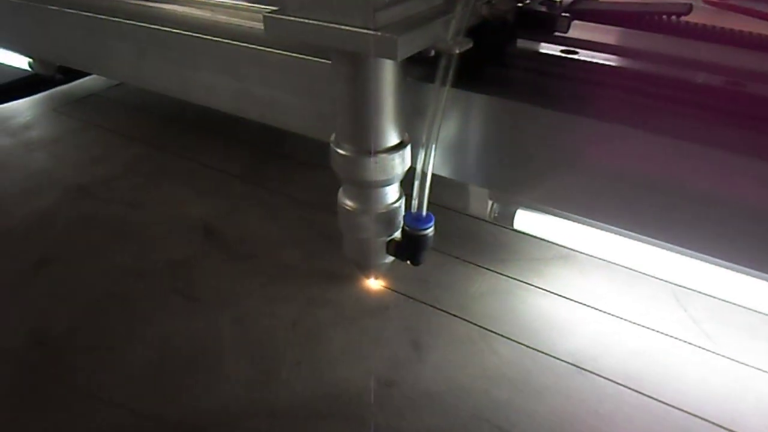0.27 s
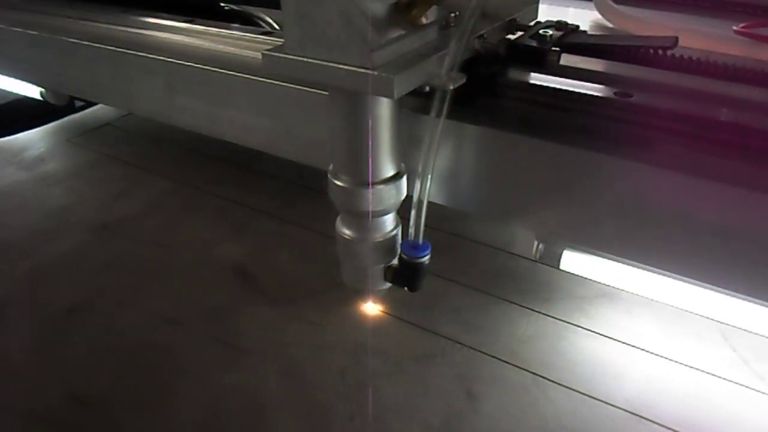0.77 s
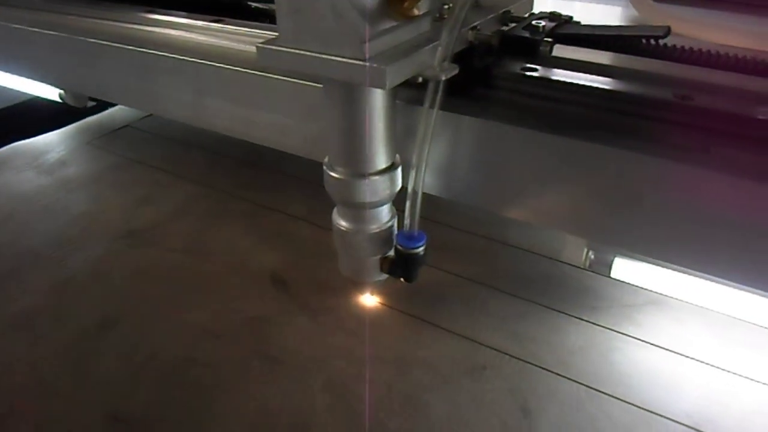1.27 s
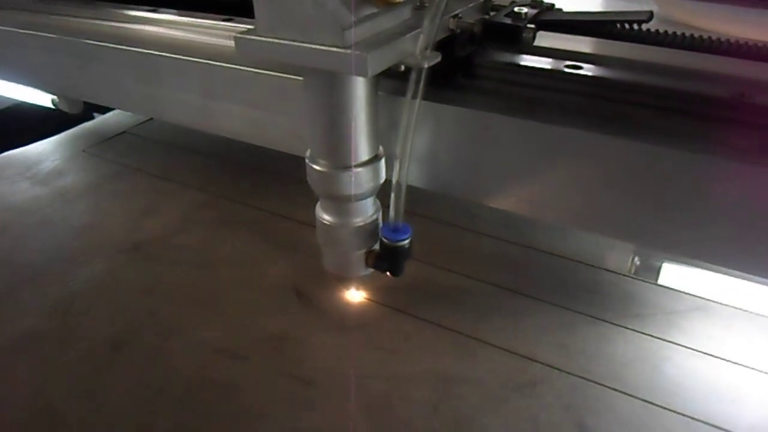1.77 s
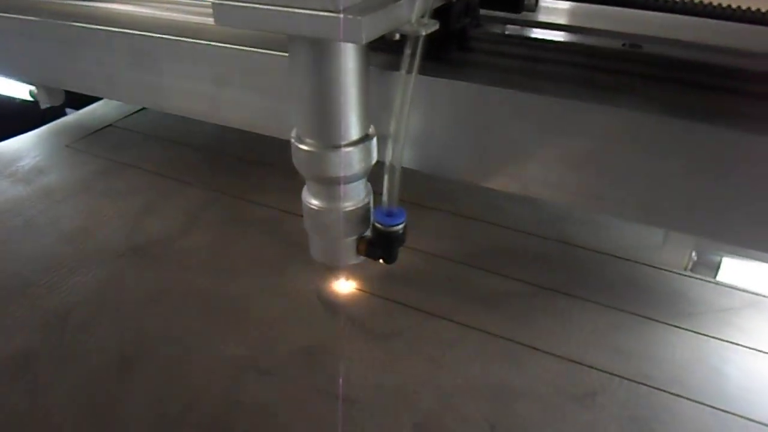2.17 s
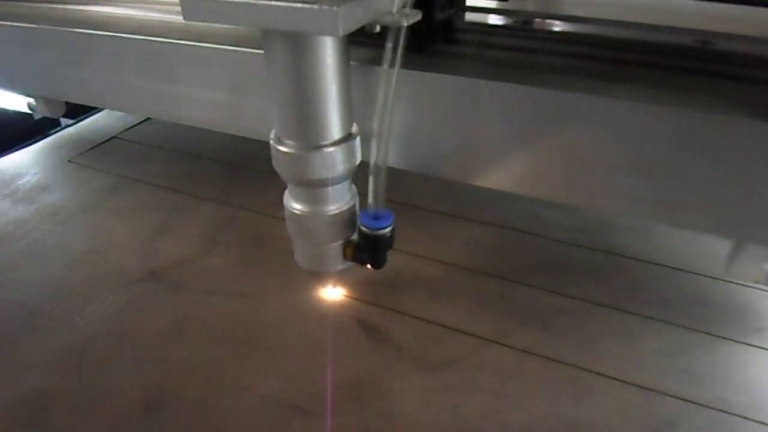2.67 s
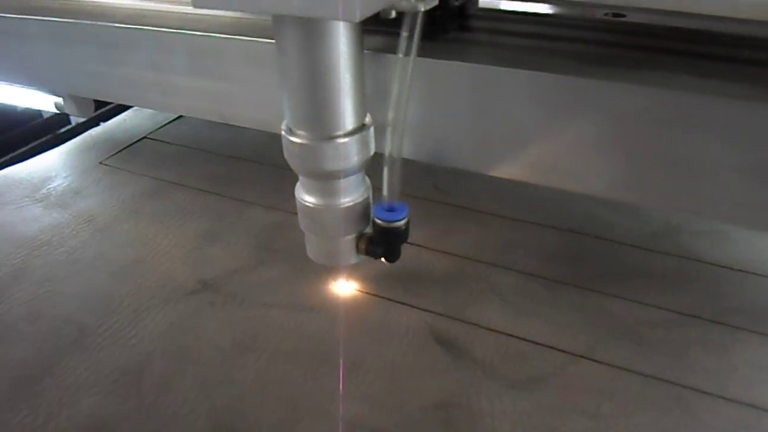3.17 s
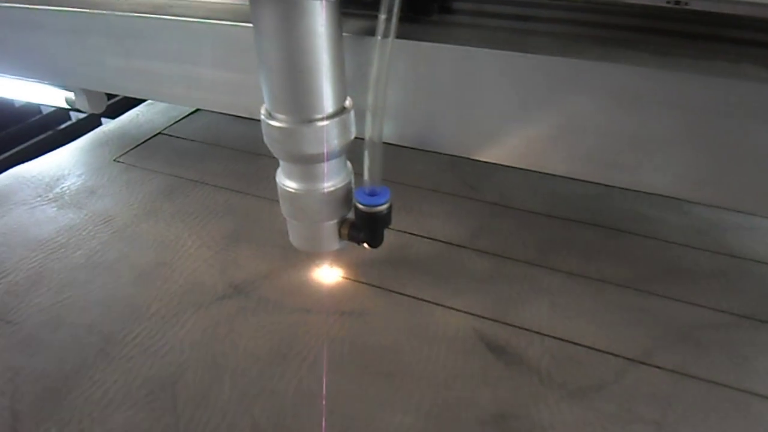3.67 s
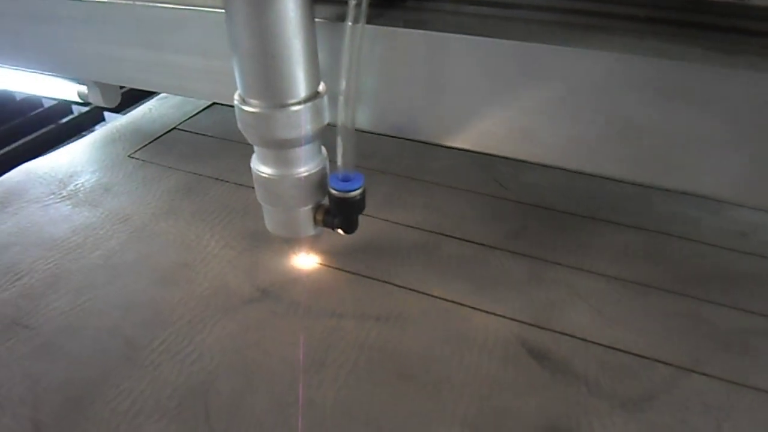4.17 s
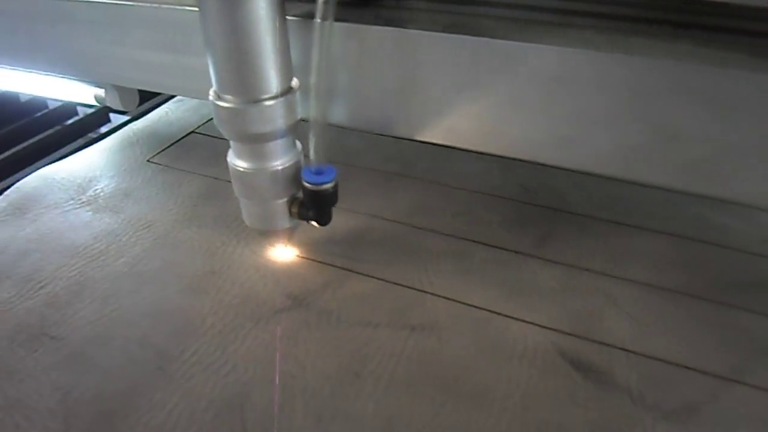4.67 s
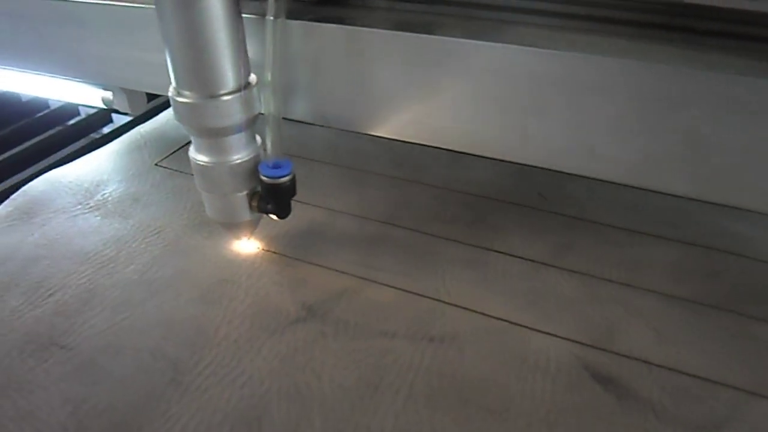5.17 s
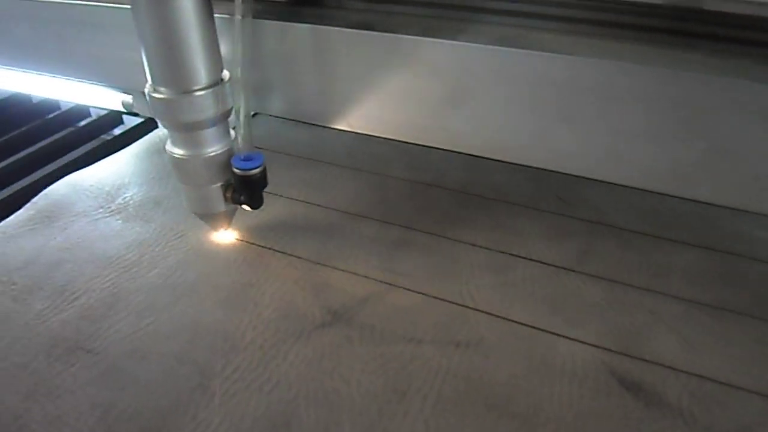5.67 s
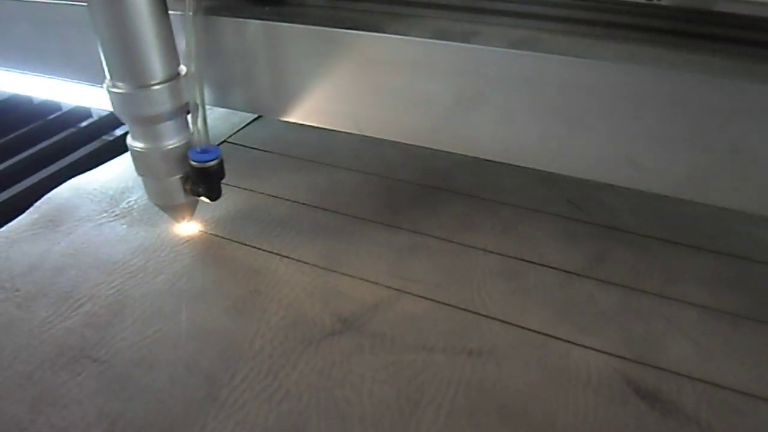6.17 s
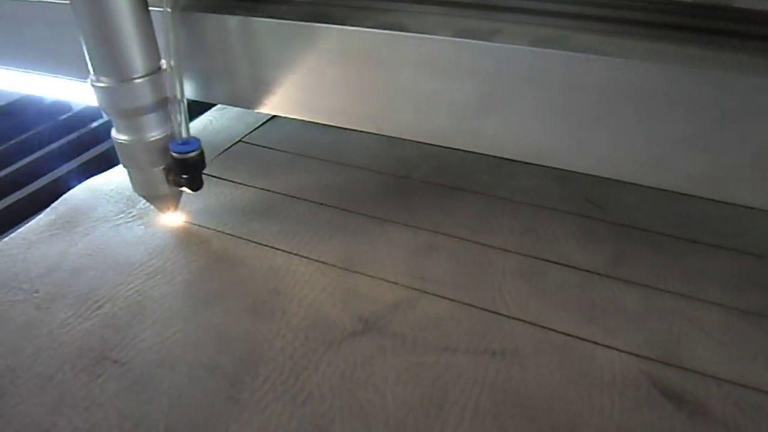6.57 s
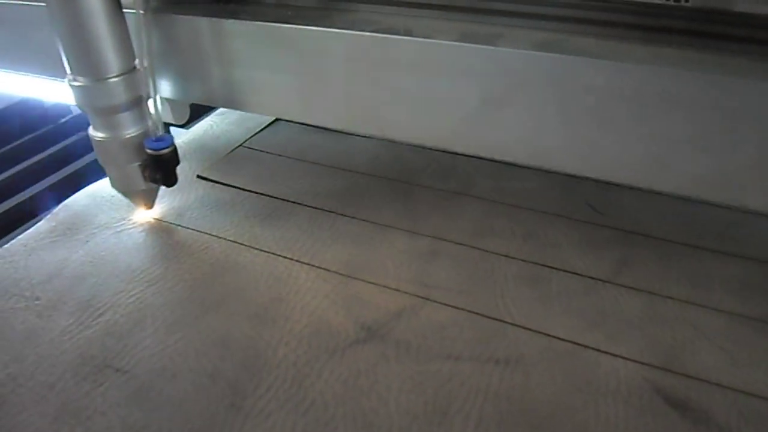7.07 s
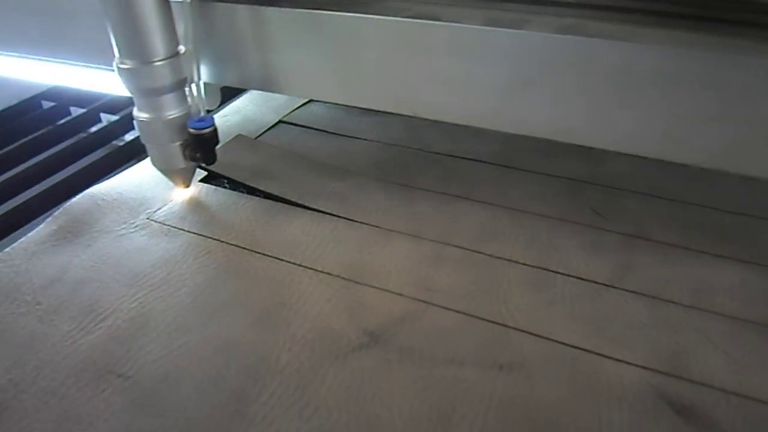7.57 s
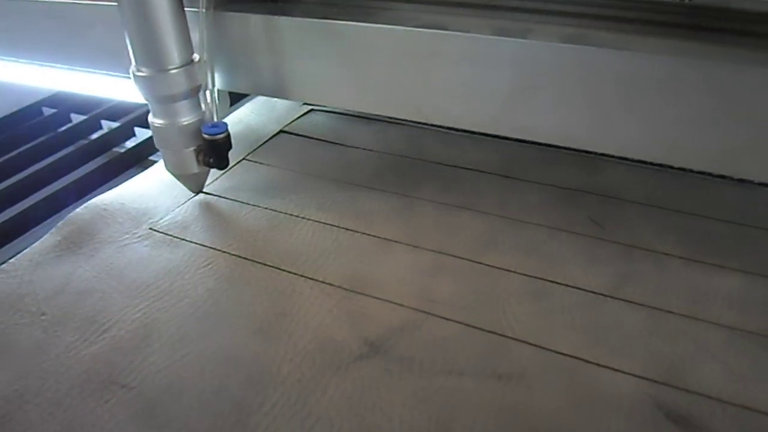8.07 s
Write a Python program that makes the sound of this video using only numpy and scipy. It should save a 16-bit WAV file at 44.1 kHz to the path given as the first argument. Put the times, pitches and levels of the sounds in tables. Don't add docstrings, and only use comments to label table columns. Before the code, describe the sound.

A dense, sizzling rush of compressed air dominates from the first moment, fluttering finely and swelling slightly. Behind it sit a pulsing pump drone, steady motor tone and airy fan rush. Near the end the motor tone stops, a cross slide whirs briefly, air puffs through the cut, the hiss eases very briefly, then a faint low thrum marks restarting. Close small microphone, essentially mono, in a machine workshop.

```python
import sys
import numpy as np
from scipy import signal
from scipy.fft import rfft, irfft, next_fast_len
from scipy.io import wavfile
from scipy.ndimage import uniform_filter1d, map_coordinates

SR = 44100
rng = np.random.default_rng(int(sys.argv[2]) if len(sys.argv) > 2 else 0)


def field_ratio(decibels):
    return 10 ** (np.asarray(decibels, dtype=float) / 20)


def digitize_waveform(pressure):
    field = np.atleast_2d(pressure).T
    bounded = np.clip(field, -1, 1)
    quanta = np.round(bounded * 32767).astype(np.int16)
    wavfile.write(sys.argv[1], SR, quanta)


N = 366902

# f/Hz, level/dB per Hz
MIDWAY_COLOUR = [(1060, -45), (1800, -29), (2080, -20.5), (2550, -20.5), (3070, -12.5), (3570, -13),
                 (3940, -17), (4940, -15), (5450, -11.5), (6240, -11.5), (7590, -8.5), (8560, -9.5),
                 (9960, 2.5), (10600, -3), (10900, -10), (14200, -29), (22000, -120)]

PUMP_HZ = 17.21
HUM_DB, HUM_DB_PER_S = 0.65, -0.5
CUT_END_S, SLIDE_RISE_S = 7.28, 0.38
BEAM_OFF_S, BEAM_ON_S, BEAM_FADE_S, RECOVER_S = 7.93, 8.11, 0.03, 0.17


def clock():
    return np.arange(N) / SR


def ramp(start, length):
    return np.clip((clock() - start) / length, 0, 1)


def bump(centre, length):
    return np.sin(np.pi * ramp(centre - length / 2, length)) ** 2


def unit(x):
    return x / np.sqrt(np.mean(x ** 2) + 1e-20)


def along(points, hz):
    f, value = np.transpose(points)
    return np.interp(np.log(hz + 1), np.log(f + 1), value)


def filtered(x, response):
    m = next_fast_len(N + 8192)
    return irfft(rfft(x, m) * response(np.fft.rfftfreq(m, 1 / SR)), m)[..., :N]


def coloured(noise, colour):
    return unit(filtered(noise, lambda hz: field_ratio(along(colour, hz))))


def wobble(rate):
    knots = rng.standard_normal(int(N * rate / SR) + 4)
    return map_coordinates(knots, [np.arange(N) * rate / SR], order=1)


def patchy(patchy_db, size):
    z = signal.stft(rng.standard_normal(N + 512), nperseg=512)[2]
    field = uniform_filter1d(rng.standard_normal(z.shape), size[0], 0)
    field = uniform_filter1d(field, size[1], 1)
    return signal.istft(z * field_ratio(patchy_db * unit(field)), nperseg=512)[1][:N]


def tones(rows, unsteady_db):
    t = np.arange(0, N, 8) / SR
    knots = np.linspace(0, N / SR, 20)
    x = np.zeros(len(t))
    for hz, db in rows:
        level = np.interp(t, knots, field_ratio(db + unsteady_db * rng.standard_normal(20)))
        x += level * np.sin(2 * np.pi * hz * t + rng.uniform(0, 2 * np.pi))
    return np.sqrt(2) * signal.resample_poly(x, 8, 1)[:N]


def standing(db, node, spacing, depth):
    return field_ratio(db) * (1 - np.clip(depth, 0, 1) * np.cos(2 * np.pi * (clock() - node) / spacing))


def rest():
    return ramp(BEAM_OFF_S - BEAM_FADE_S / 2, BEAM_FADE_S) - ramp(BEAM_ON_S, RECOVER_S)


def bounced(air, place):
    # place, off gantry/ms, off table/ms, off cover/ms
    bounces = [(0, 2.595, .9, 2.8), (.75, 2.445, .9, 2.745), (1.6, 2.443, .95, 2.76), (3, 2.42, 1.12, 2.57)]
    bounce_gain = [.13, .1, -.08]
    at, *delays = np.transpose(bounces)
    total = air
    for gain, ms in zip(bounce_gain, delays):
        delay = np.interp(place, at, ms) / 1000
        total = total + gain * map_coordinates(air, [np.arange(N) - delay * SR], order=3)
    return total


def jet():
    # t/s, place (0 near, 1 midway, 2 far, 3 corner)
    travel = [(0, 0.5), (1.6, 0.6), (3.2, 1), (5.2, 1.44), (6.1, 2.4), (6.8, 2), (7.3, 3), (8.32, 3)]
    # centre t/s, level/dB, length/s
    swells = [(.05, 0.2, .3), (0.746, -0.9, 0.4), (1.1, -1, .3), (2.2, 0, 0.57), (4.33, -1, .4),
              (5.3, 0, .5), (7.304, 1.5, .34), (7.52, -0.6, 0.17), (7.68, 0.9, .2)]
    # f/Hz, level/dB per Hz
    near_colour = [(1060, -37), (1800, -14), (2060, -23.5), (2290, -17.5), (2620, -18), (2870, -11.5),
                   (3340, -9.5), (3680, -16.5), (3970, -11.5), (6150, -11.5), (7420, -5), (8370, -7.5),
                   (9810, 5), (10300, 2.5), (10900, -1), (14200, -43), (22000, -120)]
    # f/Hz, level/dB per Hz
    far_colour = [(1060, -58), (1800, -26), (2560, -22.5), (2790, -24), (3050, -17), (3680, -15),
                  (4000, -20.5), (5210, -16.5), (5660, -15.5), (7370, -14), (7880, -9.5), (9230, -6),
                  (9960, 2.5), (10300, 0.5), (10900, -11), (14200, -43), (22000, -120)]
    # f/Hz, level/dB per Hz
    corner_colour = [(1060, -46), (1800, -22), (2360, -20), (2640, -18.5), (2870, -17), (3680, -11.5),
                     (4000, -14), (5570, -13.5), (6150, -11), (6680, -12), (8060, -5.5), (9230, -5.5),
                     (9960, 0), (10300, -1.5), (10900, -11.5), (14200, -44), (22000, -120)]

    swell_db = sum(db * bump(s, length) for s, db, length in swells)
    hiss_db = -28 - 0.2061 * clock() + swell_db - 1 * rest()
    sizzle_db = -25.5 + 0.18 * clock() + 1.4 * swell_db - 2.5 * rest()

    place = np.interp(clock(), *np.transpose(travel))
    flutter = field_ratio(0.44 * wobble(70) + 0.49 * wobble(500))
    air = bounced(flutter * patchy(0.62, size=(2, 200)), place)

    def below(hz):
        return 1 / (1 + (hz / 8650) ** 24)

    hiss, sizzle = 0, 0
    for k, colour in enumerate((near_colour, MIDWAY_COLOUR, far_colour, corner_colour)):
        share = np.clip(1 - abs(place - k), 0, 1)
        low = filtered(air, lambda hz: field_ratio(along(colour, hz)) * below(hz))
        high = filtered(air, lambda hz: field_ratio(along(colour, hz)) * (1 - below(hz)))
        hiss = hiss + share * unit(low)
        sizzle = sizzle + share * unit(high)

    edge = filtered(sizzle, lambda hz: 1 / (1 + (10300 / (hz + 1)) ** 60))
    shade_db = -2.5 + 4.5 * np.sqrt(bump(4.3, 5))
    sizzle = sizzle + (field_ratio(shade_db) - 1) * edge
    surge = field_ratio(0.23 * wobble(45) + 0.18 * wobble(150))
    return field_ratio(hiss_db) * hiss + field_ratio(sizzle_db) * surge * sizzle


def kerf():
    # t/s, level/dB, length/s
    puffs = [(7.62, -35, .13), (7.893, -31.5, .034), (8.24, -32.5, .045)]
    # f/Hz, level/dB per Hz
    puff_colour = [(1800, -30), (2600, -5), (3600, -1), (4600, 0), (6500, -2), (8000, -33)]
    gusts = sum(field_ratio(db) * np.sin(np.pi * ramp(s, length)) for s, db, length in puffs)
    thrum = field_ratio(-47.5) * ramp(8.15, 0.06) * np.sin(2 * np.pi * 106 * clock())
    return gusts * coloured(rng.standard_normal(N), puff_colour) + thrum


def drive():
    # f/Hz, level/dB per Hz
    slide_colour = [(250, -28), (330, -11), (520, -3), (700, 0), (1200, -17), (1500, -30)]
    step_hz, frame_hz = 196.2, 208.4
    step_db = -55 + 7.5 * ramp(0, CUT_END_S) ** 2
    running = field_ratio(step_db) * (1 - ramp(CUT_END_S, 0.1))
    steps = running * tones([(step_hz, 0)], unsteady_db=0.4)
    frame_gain = standing(db=-56.5, node=6, spacing=13, depth=0.8)
    frame = frame_gain * tones([(frame_hz, 0)], unsteady_db=1.5)

    whir = coloured(rng.standard_normal(N), slide_colour)
    sliding = ramp(7.19, SLIDE_RISE_S) * (1 - ramp(BEAM_OFF_S - BEAM_FADE_S, 2 * BEAM_FADE_S))
    restart = field_ratio(-12) * ramp(BEAM_ON_S + RECOVER_S / 2, RECOVER_S)
    return steps + frame + field_ratio(-46.5) * (sliding + restart) * whir


def pump():
    # multiple of PUMP_HZ, level/dB
    strong = [(1, -59), (3, -53), (4, -54), (5, -66), (6, -63), (7, -66), (9, -64), (10, -64), (15, -63),
              (16, -60), (19, -65), (40, -56), (43, -63), (44, -59), (45, -60), (46, -64), (47, -50),
              (48, -56), (49, -61), (51, -62), (52, -62), (54, -59), (55, -57), (56, -62), (63, -62),
              (81, -62), (84, -62), (85, -63)]
    # f/Hz, level/dB
    body = [(15, -70), (300, -72), (500, -73), (900, -66), (1250, -70), (1500, -70), (2100, -76),
            (2600, -95)]
    # multiple, level/dB, node t/s, node spacing/s, depth 0-1
    waves = [(40, -56.5, 6.3, 10.6, .72), (44, -60, 2.2, 7, .5), (47, -49.5, 6.9, 15.6, 0.45),
             (48, -58.5, 2.8, 4.9, 0.8), (55, -57, 7, 13, 0.3)]
    order = np.arange(1, 125)
    level = along(body, order * PUMP_HZ) + 2.5 * rng.standard_normal(len(order))
    for multiple, db in strong:
        level[round(multiple) - 1] = db
    rows = np.transpose([order * PUMP_HZ, level])

    low = order < 30
    high = ~low & ~np.isin(order, [round(k) for k, *_ in waves])
    near = field_ratio(HUM_DB + HUM_DB_PER_S * clock()) * tones(rows[low], unsteady_db=1.2)
    reach = field_ratio(1.4 - 0.7 * clock()) * tones(rows[high], unsteady_db=2.0)
    loudest = 0
    for k, *wave in waves:
        loudest = loudest + standing(*wave) * tones([(round(k) * PUMP_HZ, 0)], unsteady_db=0.1)
    return near + reach + loudest


def extraction():
    # f/Hz, level/dB per Hz
    rush_colour = [(180, -40), (300, -12), (450, -8.5), (700, -6), (900, -3.5), (1200, -3.5), (1420, -4.5),
                   (1520, -8), (1610, -5.5), (1780, -8), (1900, -10), (2020, -8.5), (2600, -10),
                   (3400, -10), (5700, -120)]
    # f/Hz, level/dB per Hz
    rumble_colour = [(10, -1), (25, 2.5), (60, 1), (80, -3.5), (130, -1.5), (200, 0.5), (330, -5),
                     (430, -33), (700, -120)]
    # f/Hz, level/dB
    hum_rows = [(47.0, -56), (47.6, -65), (94.7, -60), (97.1, -62), (99.9, -62.5), (105.1, -60.5),
                (148.2, -68), (168.3, -69), (235.4, -63)]
    opens_db = 1.6 * ramp(CUT_END_S, SLIDE_RISE_S)
    rush_db = -40 - 0.1029 * clock() + opens_db - 3.5 * rest()
    throb = field_ratio(1.1 * np.sin(4 * np.pi * PUMP_HZ * clock()))
    rush = field_ratio(rush_db) * throb * coloured(patchy(1.0, size=(2, 120)), rush_colour)
    rumble = field_ratio(-51) * coloured(rng.standard_normal(N), rumble_colour)
    hums = field_ratio(HUM_DB + HUM_DB_PER_S * clock()) * tones(hum_rows, unsteady_db=-1.0)

    shaft_hz = 54.6 + 4.5 * bump(2.5, 8.5)
    shaft = np.sin(2 * np.pi * np.cumsum(shaft_hz) / SR)
    blower = np.sqrt(2) * field_ratio(-59 + 0.5 * clock()) * shaft
    return rush + rumble + hums + blower


def scene():
    mono = jet() + kerf() + drive() + pump() + extraction()
    return np.tile(mono, (2, 1))


def doubled_rate(x):
    # f/Hz, level/dB
    doubling = [(9000, 0), (10300, 0), (11025, -6), (11450, -11.5), (11850, -17.5), (12350, -35),
                (12450, -78)]
    half = filtered(x, lambda hz: hz < SR / 4) * (1 + (-1) ** np.arange(N))
    return filtered(half, lambda hz: field_ratio(along(doubling, hz)))


def treble_split():
    start, length = 2.226, 0.044
    moment = np.sin(np.pi * ramp(start, length)) ** 0.5
    noise = rng.standard_normal(N)
    band = filtered(noise, lambda hz: field_ratio(along(MIDWAY_COLOUR, hz)) * (hz > 5100) * (hz < 10450))
    return field_ratio(-28) * moment * unit(band) * [[1], [-1]]


def roll_off(x):
    return signal.sosfilt(signal.butter(12, 13200, fs=SR, output="sos"), x)


def record(dry):
    mix = doubled_rate(dry[0]) + treble_split()
    return roll_off(mix)


dry = scene()
out = record(dry)
digitize_waveform(out)
```